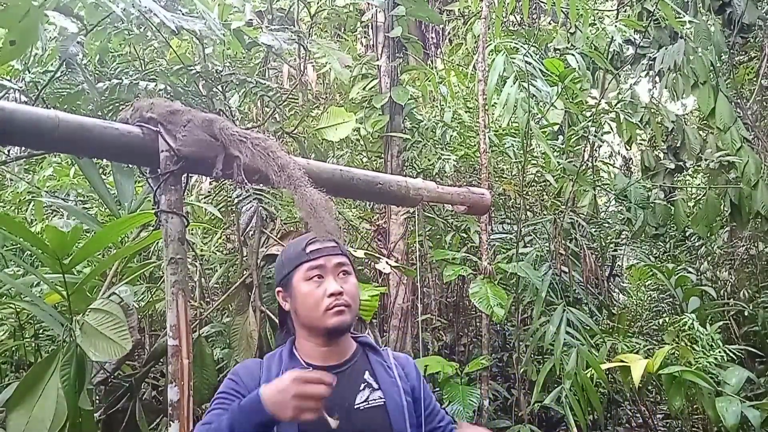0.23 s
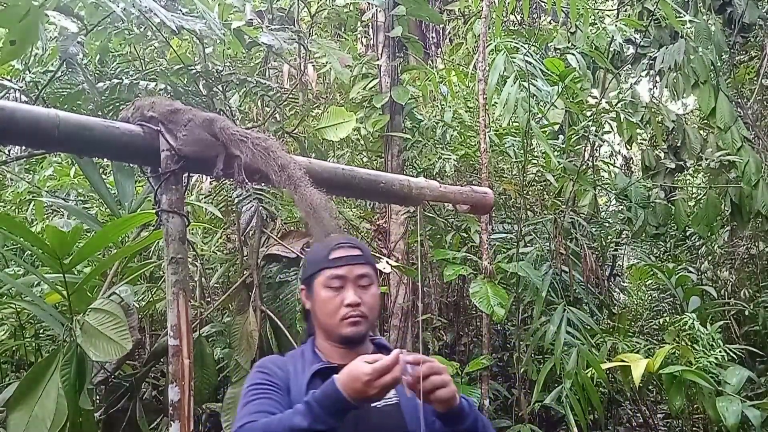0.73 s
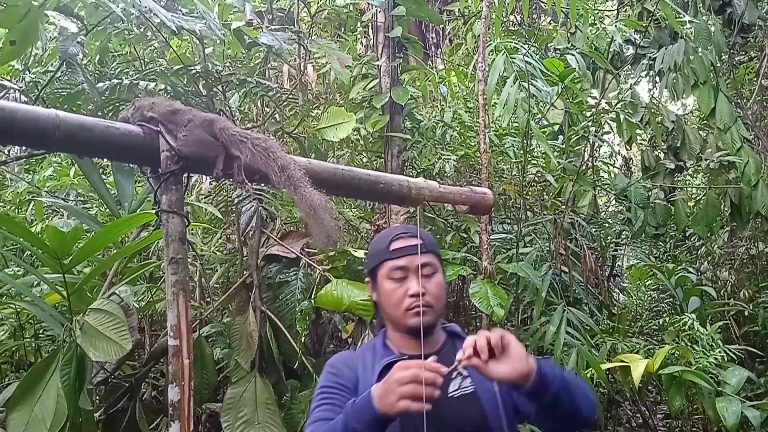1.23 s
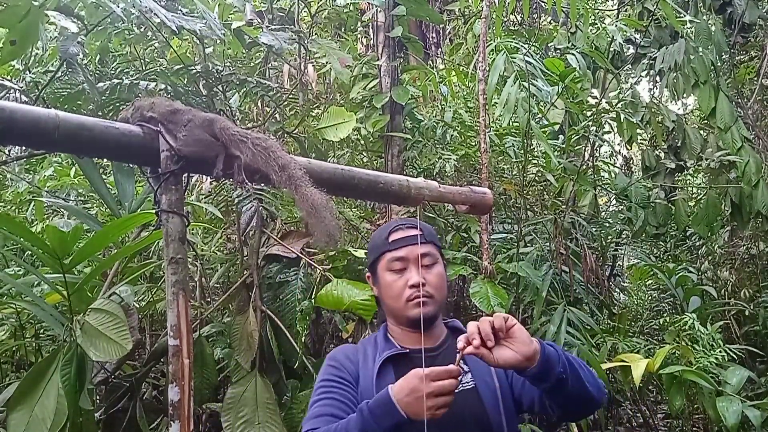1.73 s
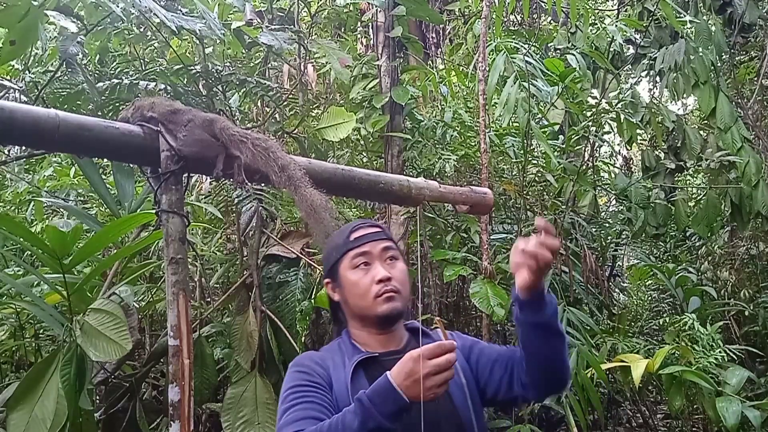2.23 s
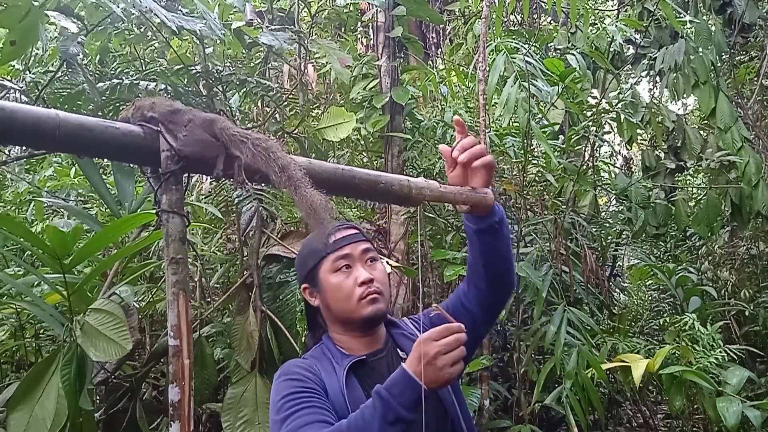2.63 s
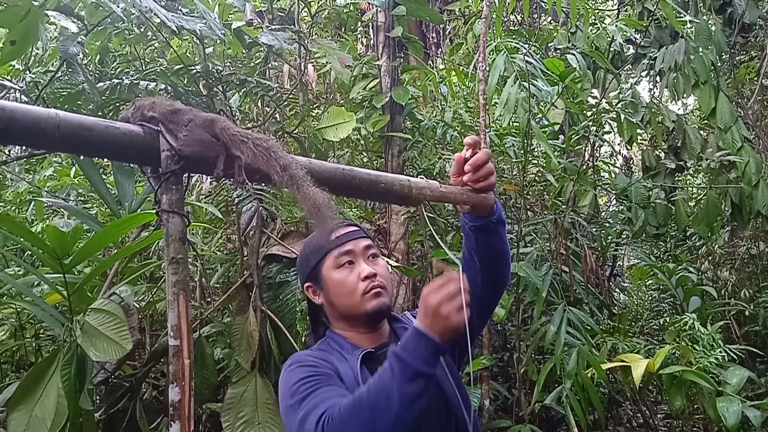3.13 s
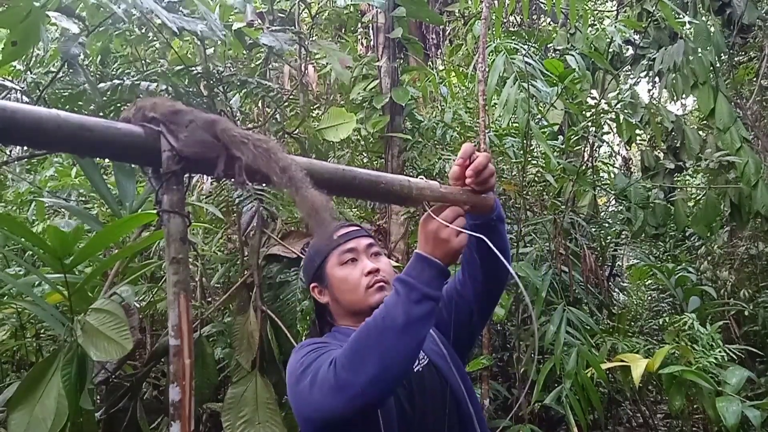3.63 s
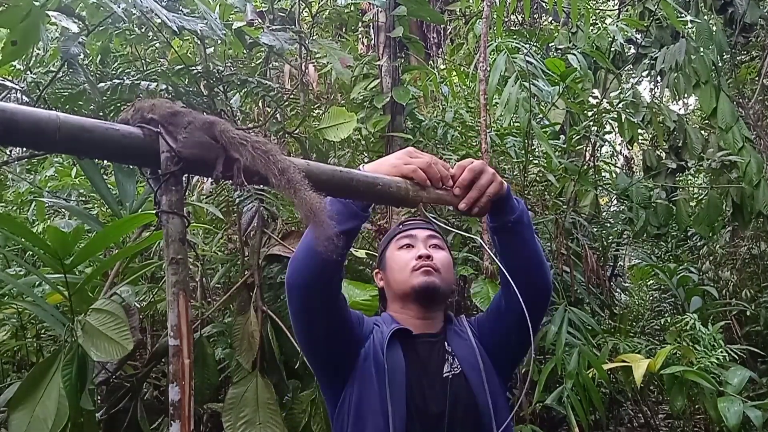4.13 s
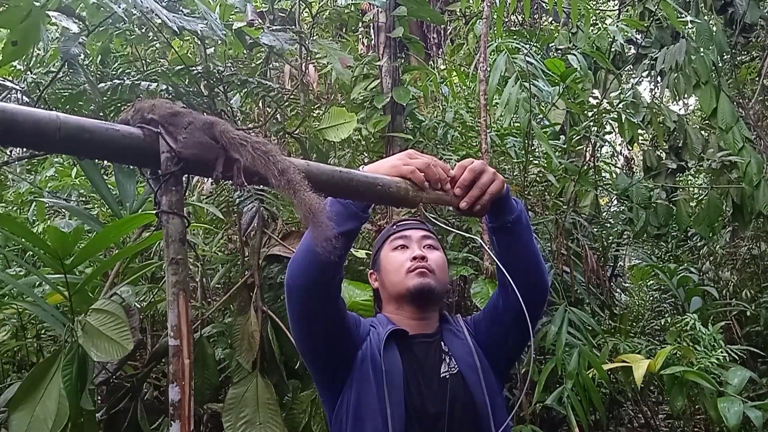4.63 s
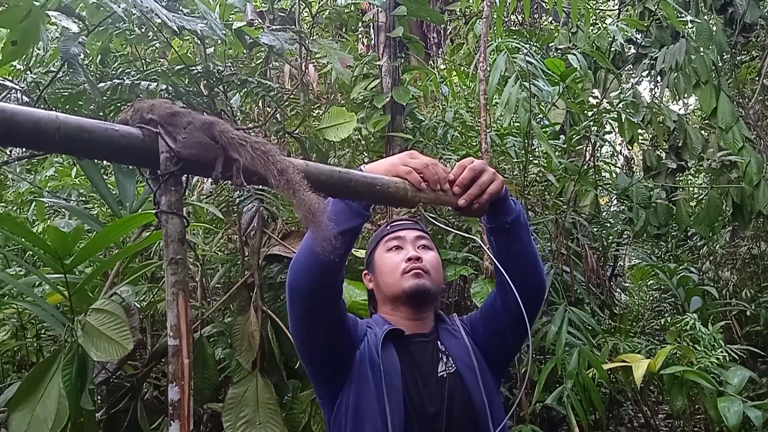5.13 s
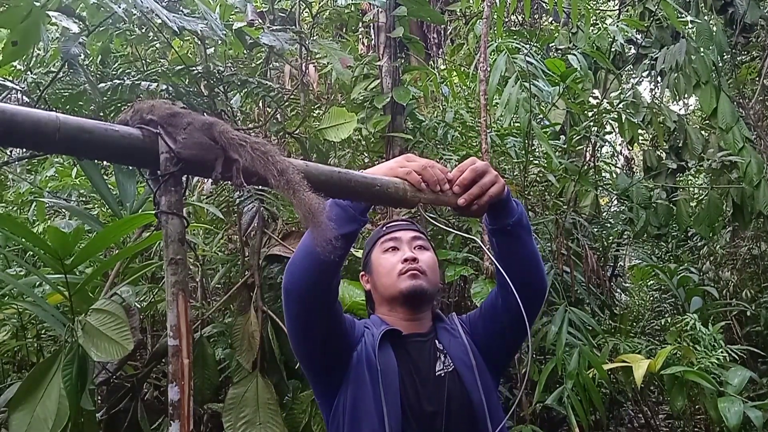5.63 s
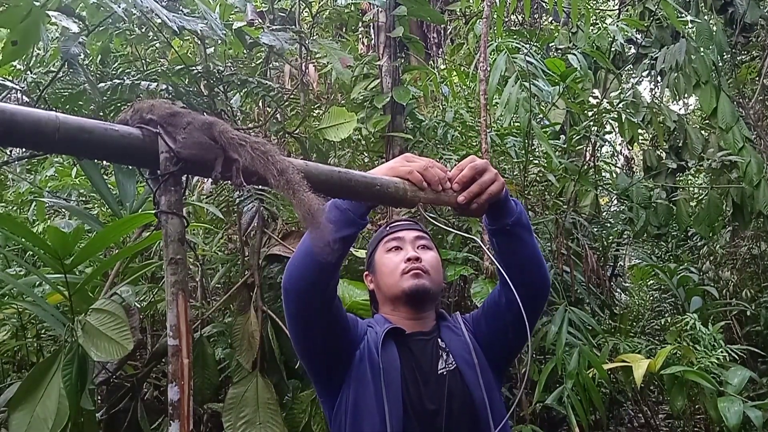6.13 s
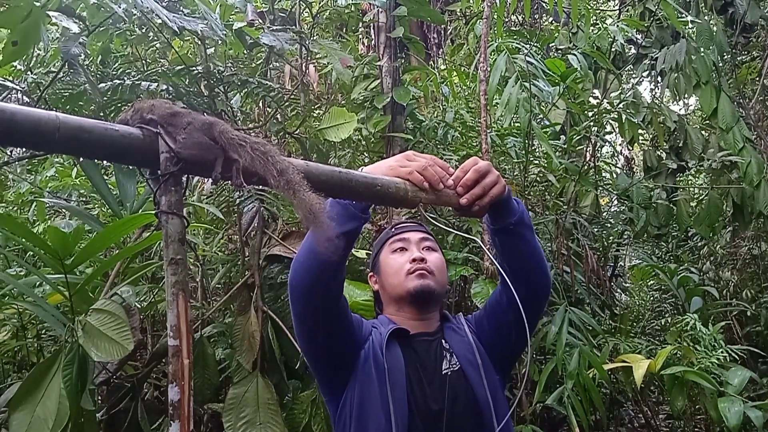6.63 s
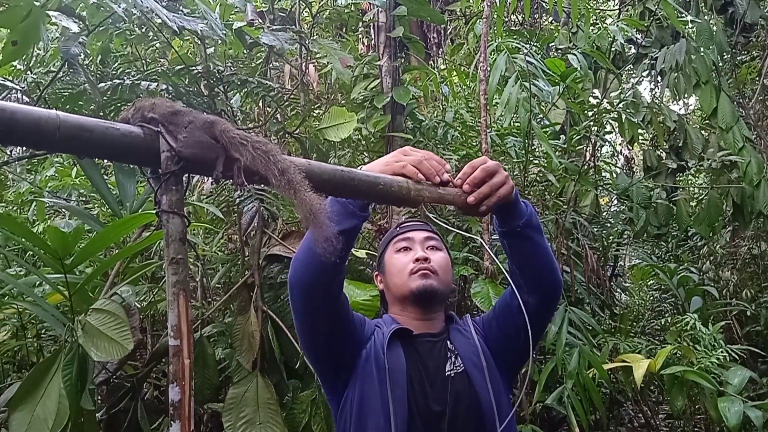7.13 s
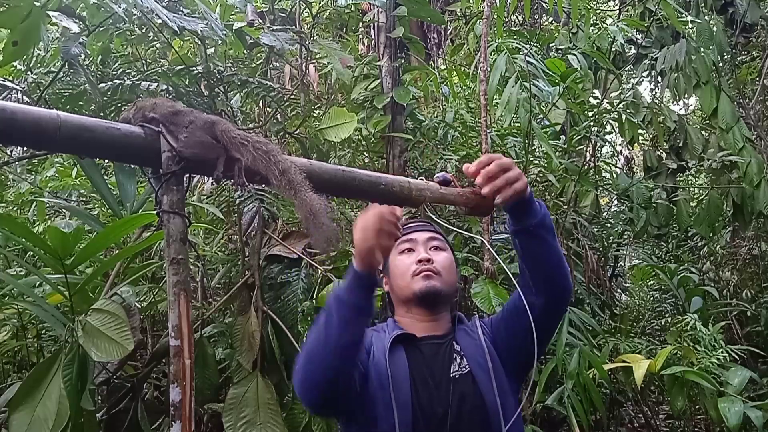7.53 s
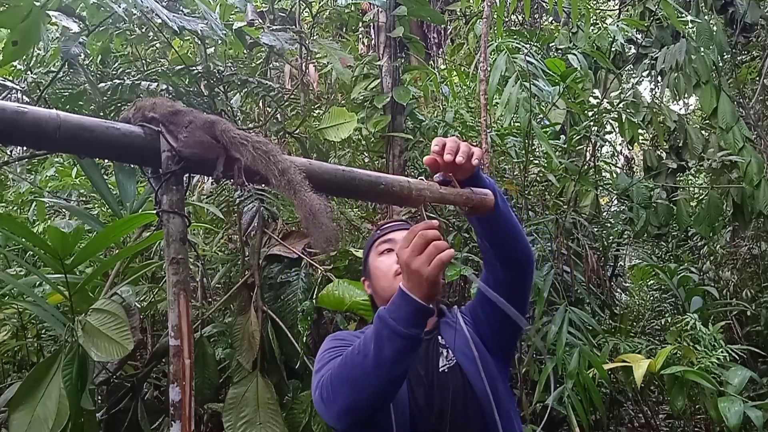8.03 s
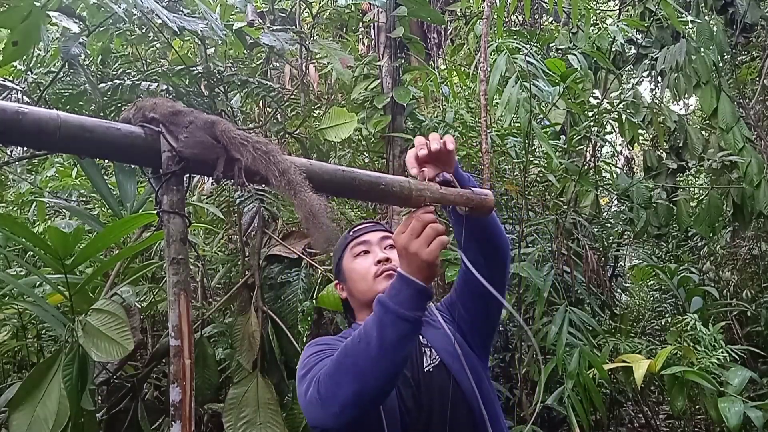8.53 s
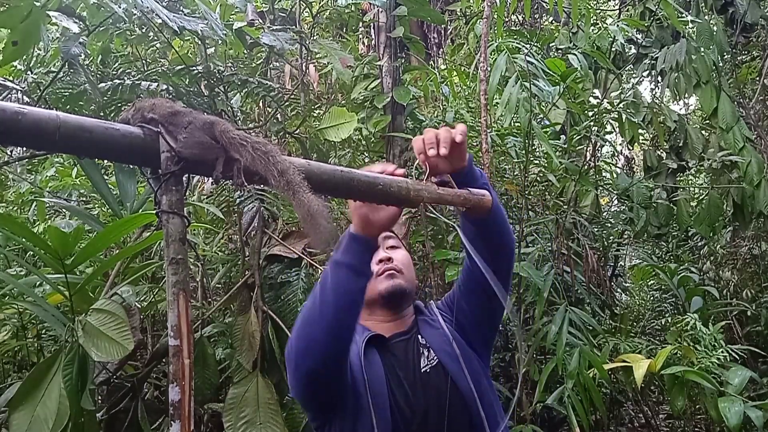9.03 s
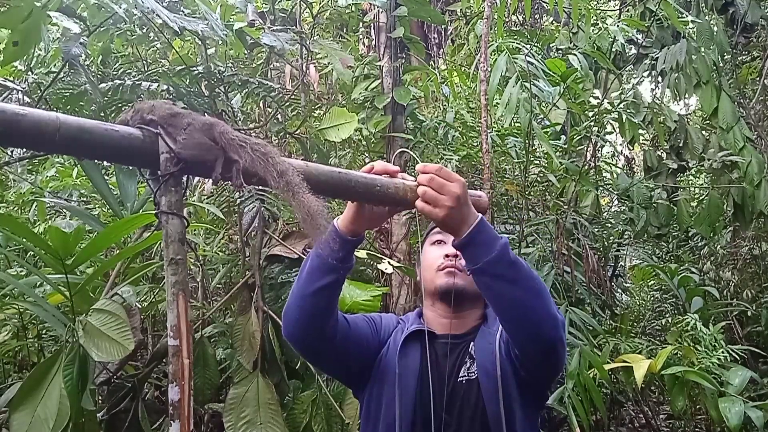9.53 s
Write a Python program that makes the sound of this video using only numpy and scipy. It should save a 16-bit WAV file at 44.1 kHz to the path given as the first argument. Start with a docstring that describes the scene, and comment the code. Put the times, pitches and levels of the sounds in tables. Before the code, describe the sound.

Throughout about ten seconds, a tropical forest sounds with a steady, shrill cicada drone near 8 kHz over soft leaf hiss. A fainter, extremely high insect chorus swells in phrases that break off around 1.2, 1.9, 4.9, 8 and 9.9 s. Close up, hands work a cord round a pole: short cloth and cord rubs mix with dry irregular ticks, busy in the first two seconds with a firm snap at 0.9, sparser from 2.3 to 4, then frequent again. The sharpest snap comes at 7.0, with stronger ticks around 8.25 and a dull low bump at 9.6. A distant bird gives short, pure falling hoots at 1.7, 1.9 and 2.4, again at 5.8, 6.0 and 6.5 with weaker notes to 7.3, then at 9.3 and 9.4 and very faintly at 9.8, each echoing softly among trees.

```python
"""Throughout, a cicada chorus drones near 8 kHz over soft leaf hiss; a higher chorus near 15 kHz swells in phrases
that break off. Both choruses are showers of random clicks filtered by the colour of the insects' bodies, and the low
one has single noise-band singers on top; the leaves are filtered noise. Close by, hands work a cord round a pole:
rubbing is hiss roughened by slips, ticks are short pushes that ring, and a low sine makes one dull bump.
Now and then a distant bird gives short falling hoots, gliding sine notes that echo off the trees."""
import sys
import numpy as np
from scipy import signal
from scipy.fft import rfft, irfft
from scipy.io import wavfile
from scipy.ndimage import uniform_filter1d

SR = 44100
rng = np.random.default_rng(int(sys.argv[2]) if len(sys.argv) > 2 else 0)


def voltage_ratio(decibels):
    """Convert decibels (scalar or array-like) to amplitude ratios, 20 dB per decade."""
    exponent = np.asarray(decibels, float) / 20
    return 10 ** exponent


def inscribe(sig):
    """Save sig as 16-bit PCM at rate SR to the path in sys.argv[1].

    A 1-D sig is mono; a 2-D sig holds one channel per row.
    Samples are clipped to [-1, 1] before scaling.
    """
    pcm = np.round(np.clip(np.atleast_2d(sig).T, -1, 1) * 32767)
    wavfile.write(sys.argv[1], SR, pcm.astype(np.int16))


N = 431738  # length of the scene in samples


def level(x, db):
    """Scale a sound so that its rms (average strength) is db."""
    return x * voltage_ratio(db) / np.sqrt(np.mean(x ** 2))


def colour(x, points):
    """Filter a sound by (f/Hz, level/dB) points, joined along a log frequency scale."""
    hz, db = np.transpose(points)
    f = np.arange(N // 2 + 1) * SR / N + 1  # the 1 avoids log(0)
    gain = voltage_ratio(np.interp(np.log(f), np.log(hz), db))
    return irfft(rfft(x) * gain, N)


def band(x, hz, width):
    """Two-pole resonance: lets a band of this width in Hz through, with gain 1 at its centre."""
    b, a = signal.iirpeak(min(hz, SR / 2.2), hz / width, fs=SR)
    return signal.lfilter(b, a, x)


def butter(x, order, hz, kind):
    """Filter that keeps what lies above ("high") or below ("low") a frequency in Hz."""
    return signal.sosfilt(signal.butter(order, hz, kind, fs=SR, output="sos"), x)


def walk(rate):
    """Random wander: a new level rate times a second, smoothed twice; spread near 1."""
    k = int(SR / rate)
    steps = np.repeat(rng.standard_normal(N // k + 1), k)
    return 1.43 * uniform_filter1d(uniform_filter1d(steps, k), k)[:N]


def add(out, s, x):
    """Mix x in at time s, in seconds."""
    i = int(s * SR)
    out[i:i + len(x)] += x[:N - i]


def clicks(per_s, spread_db):
    """Clicks at random moments, whose sizes have a long tail."""
    happens = rng.random(N) < per_s / SR
    return happens * rng.standard_normal(N) * voltage_ratio(spread_db * rng.exponential(size=N))


def gate(start, end, edge):
    """Rise from 0 to 1 around start and fall back around end, with ramps edge seconds long."""
    t = np.arange(N) / SR
    return np.clip(np.minimum(t - start, end - t) / edge + .5, 0, 1)


# body colour of the low chorus: (f/Hz, level/dB per Hz)
CICADA_BODY = [(6000, -31), (6600, -21), (6950, -10.5), (7300, -11), (7700, -7.5), (7950, -3), (8150, -1),
               (8400, -6.5), (8600, -11), (8750, -36), (9000, -39.5)]
# single singers that stand out of the low chorus: (f/Hz, width f/Hz)
SOLO_VOICES = [(6815, 45), (7028, 70), (7388, 45), (8060, 70), (8165, 60), (8350, 40), (8556, 14),
               (8638, 40)]
# how strong each of those singers is against the crowd: (level/dB)
SOLO_LEVELS = [-38, -14, -11.5, -8, -15, -16.5, -22, -23]


def cicada_chorus():
    """Membrane clicks, thousands a second, ring the bodies; so many singers blur to a drone."""
    crowd = level(colour(clicks(20000, .5), CICADA_BODY), 0) * voltage_ratio(.6 * walk(70))
    solo = np.zeros(N)
    for (hz, width), db in zip(SOLO_VOICES, SOLO_LEVELS):
        voice = band(band(rng.standard_normal(N), hz, width), hz, width)
        solo += level(voice, db)
    t = np.arange(N) / SR
    sag_db = -1.3 * np.exp(-((t - 6.3) / 1.1) ** 2)  # sags a little around 6.3 s
    return (crowd + solo) * voltage_ratio(-53 + sag_db)


# body colour of the high chorus: (f/Hz, level/dB per Hz)
KATYDID_BODY = [(13000, -40), (13700, -22), (14000, -14), (14400, -8), (14800, -3), (15050, 0), (15250, -3),
                (15450, 0), (15700, -3), (15800, -60)]
# phrases, each swelling until it breaks off: (start t/s, end t/s, level/dB it swells towards)
KATYDID_PHRASES = [(-.4, 1.24, -55.5), (1.1, 1.94, -63), (3.12, 4.89, -57.5), (5.3, 8.1, -57),
                   (6.8, 8.04, -62), (8.62, 9.1, -62), (9.2, 9.9, -56)]


def katydid_chorus():
    """Clicks ring higher bodies; the phrases add as powers over a faint steady chorus."""
    rest_db, swell_power, break_s = -69.5, .6, .12
    power = voltage_ratio(rest_db) ** 2
    for start, end, db in KATYDID_PHRASES:
        swell = np.clip((np.arange(N) / SR - start) / (end - start), 0, 1) ** swell_power
        power = power + (voltage_ratio(db) * swell * gate(-1, end, break_s)) ** 2
    chorus = level(colour(clicks(9700, .8), KATYDID_BODY), 0) * voltage_ratio(.51 * walk(65))
    return chorus * np.sqrt(power)


# colour of leaves and air: (f/Hz, level/dB per Hz)
LEAF_COLOUR = [(20, -39), (45, -6), (70, 2), (200, 2), (575, -3), (1000, -5.5), (2600, -7.5), (4500, -16),
               (6400, -13.5), (8600, -12), (9000, -15), (11000, -21.5), (13000, -25), (16000, -57)]


def leaves():
    """Soft broad hiss of leaves: filtered noise whose bass and remainder swell on their own."""
    hiss = level(colour(rng.standard_normal(N), LEAF_COLOUR), -59.5)
    low = butter(hiss, 2, 350., "low")
    return low * voltage_ratio(.7 * walk(4)) + (hiss - low) * voltage_ratio(.8 * walk(8))


# colour of the rubbing: (f/Hz, level/dB per Hz)
RUB_COLOUR = [(150, 2), (400, 6.5), (1000, 5), (2200, 5.5), (3500, -3.5), (6000, -4.5), (8600, -3.5),
              (9200, -18), (13000, -21), (16000, -34)]
# strokes of sleeve and cord: (start t/s, length t/s, level/dB, extra level/dB above 3 kHz)
RUB_STROKES = [(0, 0.025, -51.5, 5.5), (0.12, 0.15, -50.5, 6.5), (0.27, 0.2, -55.5, 5),
               (0.483, 0.057, -50.5, 3), (0.545, 0.19, -58, 7.5), (1.03, 0.18, -56.5, 8),
               (1.265, 0.18, -54, 5), (1.423, 0.14, -47, 6), (1.607, 0.18, -59, 5), (1.815, 0.16, -60, 6),
               (2.133, 0.1, -57, 5.5), (2.44, 0.11, -62.5, 12.5), (2.925, 0.048, -55.5, 5),
               (3.193, 0.21, -60.5, 2), (3.874, 0.069, -59, 8), (4.178, 0.32, -55.5, 5.5),
               (4.407, 0.046, -55, 7), (4.588, 0.046, -57.5, 4), (4.768, 0.16, -63, 2),
               (5.043, 0.087, -59, 6.5), (5.228, 0.078, -54.5, 5.5), (5.4, .14, -67, -4),
               (6.067, 0.27, -59.5, 3), (6.275, 0.19, -56, 0), (6.668, 0.074, -59, 1), (6.9, 0.18, -62, 6),
               (7.084, 0.086, -57, 12.5), (7.347, 0.066, -59, 6), (7.53, 0.23, -56, 5.5),
               (8.032, 0.11, -57, -15), (8.237, 0.096, -53, 4.5), (8.477, 0.097, -62, 2),
               (8.81, 0.092, -58.5, -4), (9.026, 0.23, -68.5, 13.5), (9.557, 0.064, -51.5, 6),
               (9.705, 0.065, -56, 4)]


def rubbing():
    """Cloth and cord hiss as they rub; small slips, each dying away in a few ms, roughen it."""
    slip_decay = np.exp(-1 / (.001 * SR))
    slips = signal.lfilter([1], [1, -slip_decay], np.abs(clicks(700, 1.3)))
    rough = rng.standard_normal(N) * (1.12 + slips)
    rub = level(colour(rough, RUB_COLOUR), 0) * voltage_ratio(walk(6.6))
    top = butter(rub, 2, 3000., "high")
    # faint rubbing goes on between the strokes
    cloth_db, cloth_bright_db = -65.5, 2
    whole = voltage_ratio(cloth_db + 1.7 * walk(7.3))
    bright = voltage_ratio(cloth_db + cloth_bright_db + 3.2 * walk(8))
    for s, length, db, bright_db in RUB_STROKES:
        stroke = voltage_ratio(db) * gate(s, s + length, .018 + .35 * length)
        whole = np.hypot(whole, stroke)
        bright = np.hypot(bright, stroke * voltage_ratio(bright_db))
    return whole * (rub - top) + bright * top


# modes, the notes at which the pole rings: (f/Hz, width f/Hz, level/dB before sharp modes are raised)
POLE_MODES = [(830, 82, -3.5), (1990, 250, 5), (2640, 250, -1), (3380, 570, -11)]


def tick(db, ring_hz, thud_db, edge_db):
    """A short push rings as a snap, with a thud, a bright edge, a scratchy tail and the pole."""
    t = np.arange(0, .15, 1 / SR)
    fibres, scratch = rng.standard_normal((2, len(t)))
    after = t > .001
    # a short push 1 ms into the tick, then the fibres crackle out
    push = np.exp(-((t - .001) / .00005) ** 2)
    push = push + .11 * fibres * np.exp(-t / .0027) * after
    snap = band(push, ring_hz, 1.8 * ring_hz)
    snap = snap + 5.3 * band(push, ring_hz, .077 * ring_hz) + .26 * band(push, 1300., 2800.)
    thud = band(band(push, 710., 870.), 530., 1800.)
    edge = band(band(push, 7400., 2600.), 2700., 10400.) + .1 * band(push, 15700., 6000.)
    scratch = scratch * (np.exp(-t / .02) + .35 * np.exp(-t / .012)) * after
    tail = band(scratch, 1180., 1340.) + 1.27 * band(scratch, ring_hz, ring_hz / 2)
    tail = tail + .95 * band(scratch, 450., 460.)
    pole = np.zeros(len(t))
    for hz, width, mode_db in POLE_MODES:
        mode_db = mode_db + 4 * rng.standard_normal()  # each tick excites the modes differently
        pole += voltage_ratio(mode_db) * band(push, hz, width) * hz / width
    tail_db = -7 - .5 * (db + 32)  # harder ticks are drier
    pole_db = -10
    parts = [(snap, 0), (thud, thud_db), (edge, edge_db), (tail, tail_db), (pole, pole_db)]
    return voltage_ratio(db) * sum(voltage_ratio(part_db) * part / np.abs(part).max() for part, part_db in parts)


# ticks of the cord: (t/s, snap level/dB before the bass cut, ring f/Hz,
# thud level/dB against the snap, edge level/dB against the snap)
CORD_TICKS = [(.0576, -43.5, 3040, -6, -8), (0.0913, -43, 5000, -6, -4), (0.1444, -39, 3040, -7, -8),
              (.155, -42, 800, -5, -8), (0.252, -39, 2430, -7, -8), (0.5397, -31.5, 2290, -9, 4.5),
              (.625, -44.5, 796, -1, -15), (0.719, -48, 1360, -18, -3), (0.7792, -32, 1310, -38, 6),
              (0.8665, -20, 2230, -18, -29), (0.988, -48, 2520, -18, -8), (1.036, -35.5, 4130, -22, -14),
              (1.1558, -31, 1660, -4, -3), (1.1844, -30.5, 1790, -3, -22), (1.2116, -30, 2520, -24, 5.5),
              (1.596, -29.5, 6300, -31, -5), (1.8133, -37, 4500, -1, 7), (1.9092, -32, 1550, -11, 5.5),
              (1.95, -32, 970, -28, 3), (2.277, -43.5, 920, 0, -8), (2.3032, -46, 2580, -3, -8),
              (2.942, -36, 2200, -18, -2), (3.214, -38, 1110, 5, -5), (3.3387, -45, 1890, -19, -8),
              (3.523, -43.5, 1640, 1, -8), (4.0055, -45.5, 1560, -9, -8), (4.1786, -44, 1890, -11, -8),
              (4.2302, -34.5, 2530, -4, -10), (4.2654, -46, 1820, -16, -13),
              (4.3125, -28.5, 2840, -24, -25), (4.4059, -33, 1510, 1.5, -9), (4.4259, -30.5, 1600, -5, 8.5),
              (4.5875, -44.5, 1150, 2, -6), (5.021, -46, 1440, 3, -11), (5.1183, -49, 1190, -11, -8),
              (5.0898, -48, 5000, -15, -6), (5.1974, -46.5, 4330, -5, -4), (5.25, -31, 1430, -4, 1),
              (5.3965, -41, 1110, -15, 0), (5.414, -42, 2240, -7, -8), (5.7271, -39, 2770, -1, -10),
              (5.827, -30.5, 1110, -22, -16), (6.0773, -39, 1720, -0.5, 0), (6.213, -28, 1440, -7, -19),
              (6.354, -31.5, 1870, -5, -4), (6.5068, -41.5, 945, 2, 8.5), (6.8097, -33.5, 1720, -24, -9),
              (6.9, -38.5, 1030, 1, -2), (7.002, -15, 1400, -7, -1), (7.0842, -46.5, 1050, 6, -11),
              (7.105, -35.5, 1840, -4, -14), (7.1315, -31.5, 1100, -5, -18), (7.4251, -47, 1240, -9, 14.5),
              (7.553, -27.5, 2530, -3.5, -15), (7.6633, -35.5, 1440, -27, -17),
              (7.6768, -33.5, 2150, -31, -10), (7.7736, -41, 2940, -22, 4), (7.853, -42, 2350, -13, -6),
              (7.935, -38, 1770, -19, -10), (8.0414, -30.5, 1080, -15, -17), (8.2378, -49, 1880, -11, -8),
              (8.2499, -26, 1950, 0, -24), (8.2868, -24, 1270, -1, -21), (8.858, -42, 2440, -10, -8),
              (8.885, -38, 988, -19, 7), (8.99, -35.5, 6000, -15, -11), (9.027, -44, 2740, -22, -8),
              (9.0723, -42, 5980, -24, 5), (9.158, -45, 2460, -21, -10), (9.5696, -32, 1520, -1, 3),
              (9.677, -38.5, 1180, -4, 2)]


def ticks():
    """The cord snaps at set moments, with 30 faint ticks at random ones; the bass is cut."""
    out = np.zeros(N)
    faint = [(u * N / SR, -46 - 6 * v, 1000 * 2 ** (1.8 * w), -10, -8)
             for u, v, w in rng.random(size=(30, 3))]
    for s, db, ring_hz, thud_db, edge_db in CORD_TICKS + faint:
        add(out, s, tick(db, ring_hz, thud_db, edge_db))
    return butter(out, 2, 300., "high")


# calls of the bird; the rougher ones split into a low and a high voice:
# (t/s, peak level/dB, start f/Hz, end f/Hz, length t/s)
BIRD_HOOTS = [(1.69, -42.5, 930, 655, 0.063), (1.86, -40, 906, 665, 0.063), (2.385, -40, 915, 664, 0.057),
              (5.793, -40.5, 910, 659, 0.058), (5.959, -38.5, 927, 662, 0.062),
              (6.476, -39.5, 907, 663, 0.057), (6.581, -53.5, 980, 948, 0.052),
              (6.598, -44.5, 900, 717, 0.023), (6.759, -51, 1037, 914, 0.039),
              (6.765, -46.5, 890, 724, 0.055), (7.34, -58, 1020, 932, 0.056),
              (7.349, -45.5, 856, 684, 0.026), (9.279, -46, 945, 655, 0.072), (9.44, -38, 907, 671, 0.055),
              (9.772, -56, 885, 700, .05)]


def hoots():
    """Pure notes whose pitch drops fast at first and then settles."""
    out = np.zeros(N)
    glide_s, glide_power = .0264, 1.42
    for s, db, start_hz, end_hz, length in BIRD_HOOTS:
        t = np.arange(0, length + .03, 1 / SR)
        fall = np.clip(1 - t / glide_s, 0, 1) ** glide_power
        hz = end_hz + (start_hz - end_hz) * fall
        rise = np.clip(t / .0093, 0, 1) ** .37
        shape = rise / (1 + np.exp((t - .83 * length) / .0048))
        add(out, s, voltage_ratio(db) * shape * np.sin(2 * np.pi * np.cumsum(hz) / SR))
    return out


# stands of trees that send the call back: (delay t/s, level/dB against the call, before flutter)
TREE_STANDS = [(.035, -25), (.083, -20), (.19, -25)]


def forest_echo(call):
    """Trunks smear the call: a dying wash of noise-like echoes, with denser returns from the stands."""
    t = np.arange(0, .6, 1 / SR)
    wash = rng.standard_normal(len(t)) * np.exp(-t / .11) * (t > .006)
    forest = level(wash, -59)
    stand_depth_s = .0086
    for delay, db in TREE_STANDS:
        stand = rng.standard_normal(len(t)) * np.exp(-((t - delay) / stand_depth_s) ** 2)
        forest += voltage_ratio(db) * stand / np.sqrt(np.sum(stand ** 2))
    # moving leaves make the echo flutter and blur its pitch
    return signal.fftconvolve(call, forest)[:N] * voltage_ratio(3 * walk(60))


# brief dips of the insects and leaves: (start t/s, end t/s, level/dB)
BACKGROUND_DIPS = [(4.03, 4.33, -2.5), (9.085, 9.34, -3)]


def background_dips():
    """Gain that lowers the background briefly, with edges of 40 ms."""
    return voltage_ratio(sum(db * gate(start, end, .04) for start, end, db in BACKGROUND_DIPS))


# a dull bump on the pole: (t/s, level/dB, f/Hz, length t/s)
POLE_KNOCK = (9.57, -53, 140, .058)


def knock():
    """The pole shakes at one low note, with a quick rise and a soft end."""
    out = np.zeros(N)
    s, db, hz, length = POLE_KNOCK
    t = np.arange(0, .15, 1 / SR)
    shake = np.clip(t / .0062, 0, 1) / (1 + np.exp((t - length) / .009))
    add(out, s, voltage_ratio(db) * shake * np.sin(2 * np.pi * hz * t))
    return out


def scene():
    """All sources at one microphone."""
    background = cicada_chorus() + katydid_chorus() + leaves()
    hands = rubbing() + ticks() + knock()
    call = hoots()
    bird = call + forest_echo(call)
    return (background * background_dips() + hands + bird)[None]


def top_cut(x):
    """Nothing passes above the cut-off."""
    return signal.sosfilt(signal.butter(12, 16820, fs=SR, output="sos"), x)


def record(dry):
    """The microphone drops the deep bass; the top is cut steeply near 15.5 kHz."""
    mix = butter(dry, 2, 45., "high")
    steep_cut = signal.ellip(10, .2, 45, 15470, fs=SR, output="sos")
    mix = signal.sosfilt(steep_cut, mix)
    return top_cut(mix)


dry = scene()
out = record(dry)
inscribe(out)
```